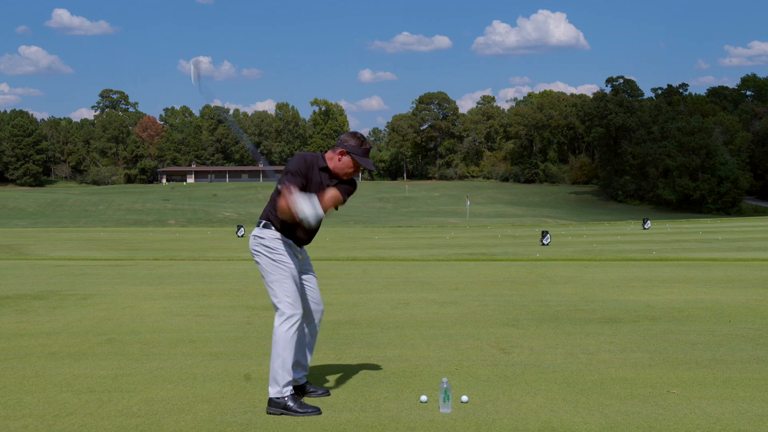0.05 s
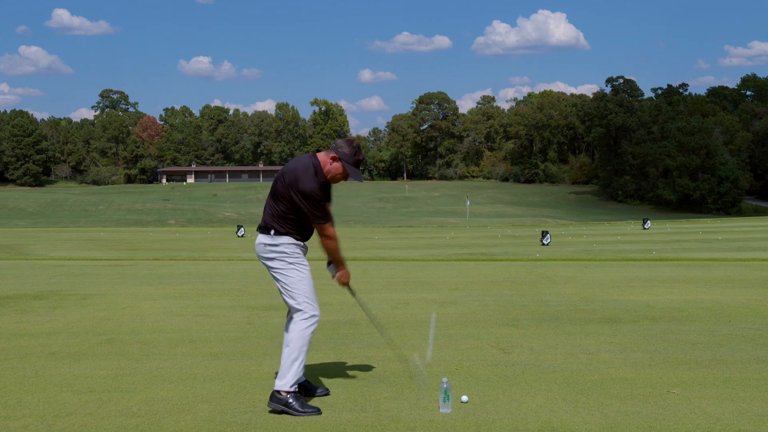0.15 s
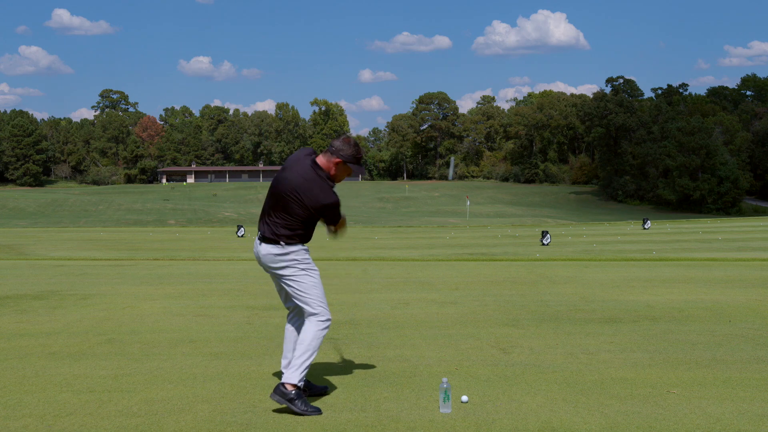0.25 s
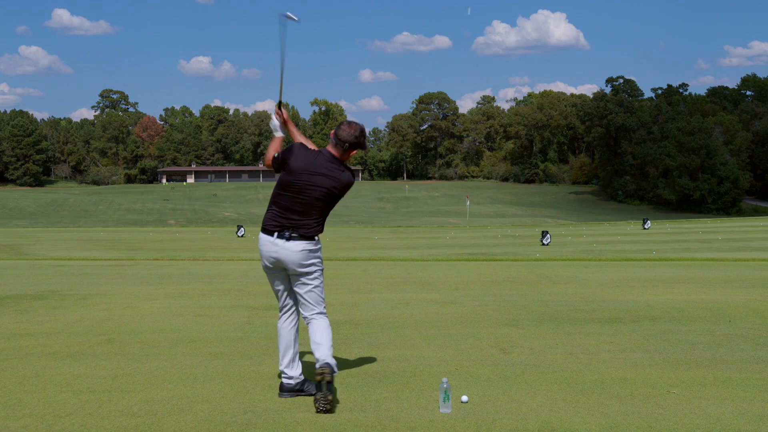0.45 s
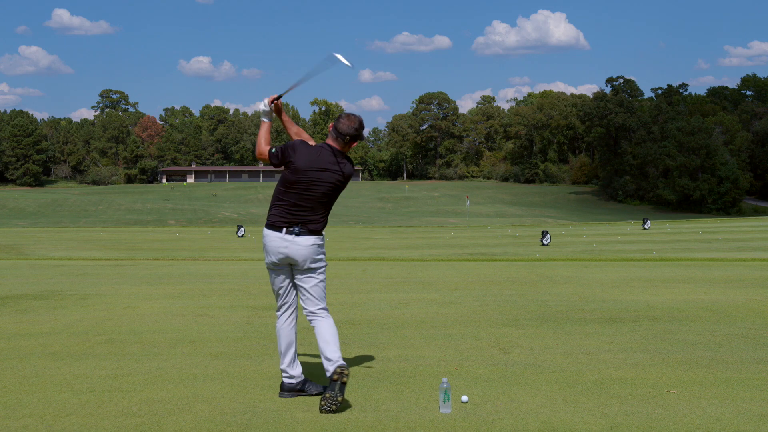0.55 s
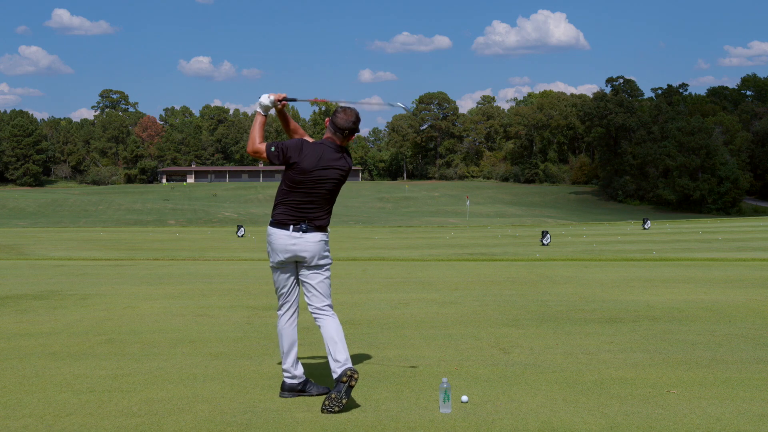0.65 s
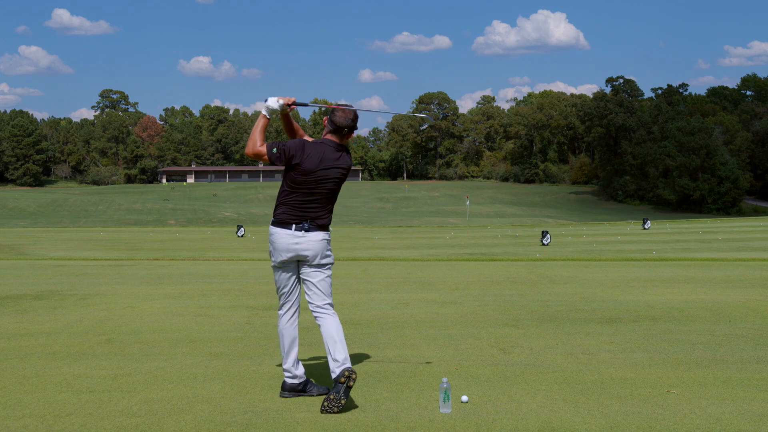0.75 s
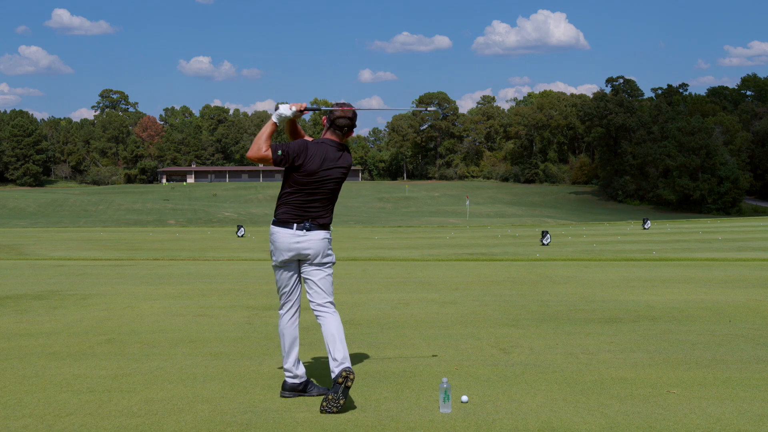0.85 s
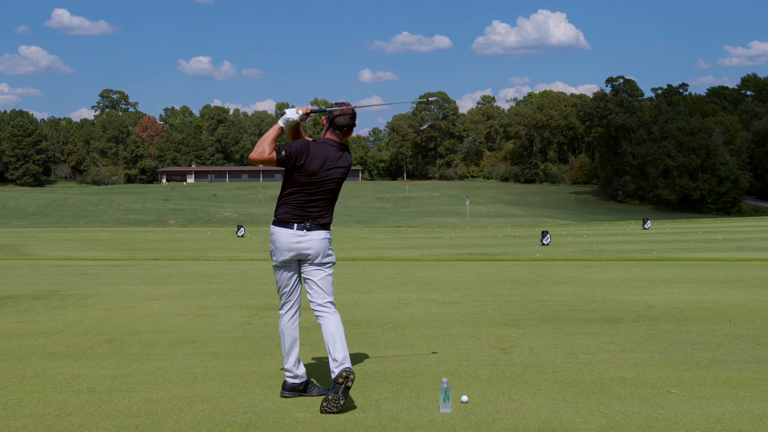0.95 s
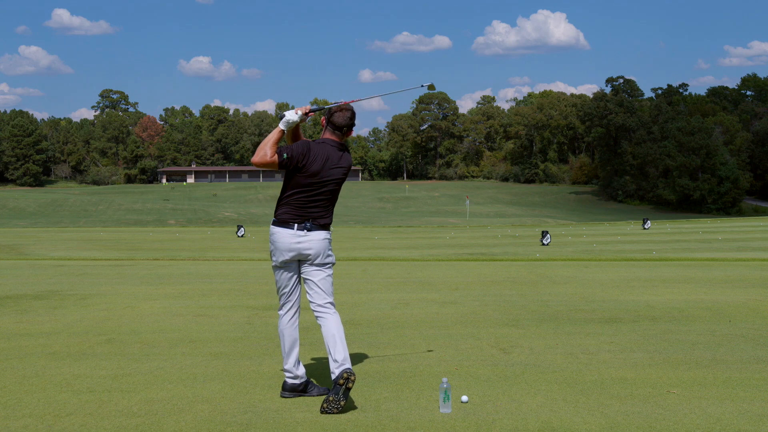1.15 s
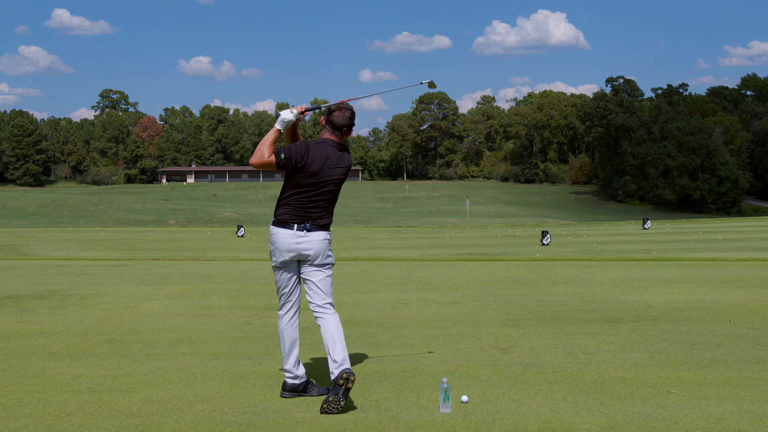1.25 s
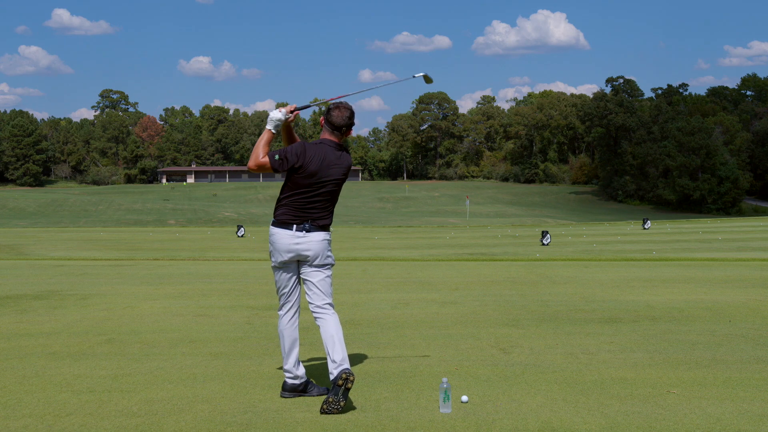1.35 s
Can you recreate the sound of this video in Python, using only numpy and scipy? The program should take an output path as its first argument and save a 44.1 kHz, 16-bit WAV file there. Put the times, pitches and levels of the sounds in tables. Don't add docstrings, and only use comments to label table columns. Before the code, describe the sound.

Close golf shot outdoors: cloth snaps and thumps on the body microphone, the club whooshes up in pitch, the ball is hit with a bright crack, rustling fades into faint air hush, and cloth rubs again at the end.

```python
import sys
import numpy as np
from scipy import signal
from scipy.fft import rfft, irfft
from scipy.io import wavfile
from scipy.ndimage import uniform_filter1d

SR = 44100
rng = np.random.default_rng(int(sys.argv[2]) if len(sys.argv) > 2 else 0)


def voltage_ratio(level):
    return 10 ** (np.asarray(level, float) / 20)


def log_audio(samples):
    frames = np.atleast_2d(samples).T
    limited = np.clip(frames, -1, 1)
    pcm = np.round(limited * 32767).astype(np.int16)
    wavfile.write(sys.argv[1], SR, pcm)


N = 61739
T = np.arange(N) / SR


def noise():
    return rng.standard_normal(N)


def colour(x, points):
    hz, db = np.array(points, float).T
    f = np.maximum(np.arange(N // 2 + 1) * SR / N, 1)
    gain = voltage_ratio(np.interp(np.log(f), np.log(hz), db))
    y = irfft(rfft(x) * gain, N)
    return y / np.std(y)


def band(x, hz, width):
    edges = [hz / (1 + width), min(hz * (1 + width), SR * 0.45)]
    y = signal.sosfilt(signal.butter(1, edges, "band", fs=SR, output="sos"), x)
    return y / np.std(y)


def high_pass(x, order, hz):
    return signal.lfilter(*signal.butter(order, hz, "high", fs=SR), x)


def walk(rate):
    k = int(SR / rate)
    steps = np.repeat(rng.standard_normal(N // k + 1), k)
    w = uniform_filter1d(uniform_filter1d(steps, k), k)[:N]
    return w / np.std(w)


def push(s, ms):
    u = (T - s) / (ms / 1000)
    return np.where((u > 0) & (u < 1), np.sin(np.pi * u) ** 2, 0)


def fade(s, t60):
    return (T > s) * voltage_ratio(-60 * np.clip(T - s, 0, 1) / t60)


def ring(x, modes):
    out = 0
    for hz, db, t60 in modes:
        pole = np.exp(2j * np.pi * hz / SR - np.log(1000) / (t60 * SR))
        out = out + voltage_ratio(db) * signal.lfilter([1], [1, -pole], x).imag
    return out


def course():
    # frequency in Hz, level in dB per Hz
    air = [(15, -31.5), (25, -5), (130, -3), (223, -12), (560, -15), (775, -8), (840, -12.5),
           (14400, -30.5), (16000, -38)]
    # multiple of the base pitch, level in dB
    orders = [(1, -78), (2, -84), (4, -85), (5, -78), (6, -80), (7, -83), (8, -86), (9, -89), (10, -89),
              (12, -87)]
    mower_hz, mower_db, air_db = 129.2, 5, -71
    phase = 2 * np.pi * np.cumsum(mower_hz * (1 + 0.002 * walk(2.5))) / SR
    mower = 0
    for k, db in orders:
        level = voltage_ratio(db + mower_db + 0.92 * walk(9.4))
        mower = mower + level * np.sin(k * phase + 6 * rng.random())
    hush = voltage_ratio(air_db + 0.8 * walk(4)) * colour(noise(), air)
    return hush + mower


def fibres():
    fibres_per_s, scatter_db, click_db = 900, 2.2, -4
    out = 0
    for hz in 125 * 2.0 ** np.arange(7):
        size = voltage_ratio(scatter_db * rng.exponential(1, N)) * noise()
        clicks = size * (rng.random(N) < fibres_per_s / SR)
        grain = voltage_ratio(click_db) * clicks / np.std(clicks) + noise()
        out = out + np.sqrt(hz) * band(grain, 1.4 * hz, 0.45)
    return out


def shirt():
    # peak time in seconds, peak dB, width in ms, crackle dB, crackle t60 in seconds
    snaps = [(0.0670, -29, 0.51, -36, 0.011), (0.0694, -37, 0.46, -42, 0.013),
             (0.091, -33, 2.1, -59.5, .03), (0.0952, -50, 1.2, -46, 0.029),
             (.1003, -20, 0.32, -38.5, 0.027), (0.1052, -30.5, 0.76, -45, 0.013),
             (.111, -29.5, 0.4, -56, 0.02), (0.2513, -34, .8, -46, .03), (0.2746, -30, 0.45, -40, 0.032),
             (0.2856, -27.5, 0.71, -40, 0.023), (0.2948, -26, 0.34, -42, 0.021),
             (0.2987, -31, 0.44, -49, 0.019), (0.3251, -31, 0.83, -54.5, .04),
             (0.4359, -37.5, 1.96, -71, 0.019), (1.347, -48.5, 1.2, -64.5, 0.025)]
    slaps = [(.2471, -16.5, .5, -46.5, 0.021), (.417, -38.5, 0.18, -60, 0.02), (.4055, -41, 0.41, -71, .02),
             (.496, -44, 0.97, -62, .02), (.574, -46, 1.19, -65.5, 0.045), (.764, -53.5, 0.56, -66.5, .04),
             (.805, -55, .4, -63.5, .03), (1.138, -53, 0.31, -62.5, 0.017), (1.302, -50, 0.54, -74, .02),
             (1.3565, -33.5, 0.31, -58, 0.017), (1.3595, -44.5, 0.49, -65, 0.018),
             (1.3634, -48, 0.44, -73.5, 0.018), (1.3705, -50, .5, -69, .02)]
    # time in seconds, rub level in dB, rumble level in dB
    turn = [(0, -65.5, -65), (0.03, -52, -66.5), (.11, -55, -54), (0.14, -58.5, -44.5), (.18, -55, -56),
            (.25, -47.5, -41), (0.301, -51, -52.5), (.34, -60, -57), (0.421, -63, -57), (.52, -65, -66.5),
            (.66, -71, -72.5), (.85, -76, -71.5), (1.22, -75.5, -70), (1.295, -64.5, -65),
            (1.342, -60.5, -56), (1.4, -62, -63.5)]
    # frequency in Hz, level in dB per Hz
    rub_colour = [(150, -3.5), (400, -0.5), (1000, -5), (2000, -11), (3500, -18), (6000, -20),
                  (11000, -27.5), (16000, -34)]
    rumble_colour = [(20, -11), (45, 0), (120, -8), (250, -12.5), (600, -32), (2000, -69)]
    crackle_colour = [(300, -9.5), (1000, 2.5), (2500, 2), (5000, -6.5), (8000, -6.5), (12000, -9),
                      (16000, -10)]
    tick_s = [.0688, .658, .0945]
    # frequency in Hz, level in dB, t60 in seconds
    ticks = [
        (4156, -38, 0.031),
        (1790, -56, 0.034),
        (5500, -42, 0.016),
    ]

    pulses, tails = 0, 0
    for sign, rows in ((0.98, snaps), (-0.86, slaps)):
        for s, db, ms, crackle_db, t60 in rows:
            pulses = pulses + sign * voltage_ratio(db) * push(s - ms / 1000, 2 * ms)
            tails = tails + voltage_ratio(crackle_db) * fade(s - 0.0003, t60)
    pulses = high_pass(pulses, 1, 110)
    crackle = tails * colour(fibres(), crackle_colour)

    s, rub_db, rumble_db = np.array(turn).T
    rub = voltage_ratio(np.interp(T, s, rub_db) + 2.5 * walk(60)) * colour(fibres(), rub_colour)
    rumble = voltage_ratio(np.interp(T, s, rumble_db) + 2.0 * walk(25)) * colour(noise(), rumble_colour)
    knocks = sum(ring(push(s, 0.068) / 2, [mode]) for s, mode in zip(tick_s, ticks))
    return pulses + crackle + rub + rumble + knocks


def creases():
    # centre time in seconds, centre Hz, level in dB, length in ms
    folds = [(.0745, 9000, -57, 4), (.085, 5000, -56.5, 3), (.103, 12400, -44, 4), (.1072, 11500, -46, 4),
             (.2355, 9000, -56, 5), (0.2428, 10500, -48.5, 7), (.249, 8498, -44, 3), (.269, 3460, -52.5, 6),
             (.379, 2910, -63.5, 16), (.406, 3000, -58.5, 9.5), (.432, 5015, -67, 27), (.49, 3000, -63, 15),
             (.53, 5000, -66, 4), (.575, 5000, -74, 40), (.60, 3995, -68, 13.8), (.627, 8000, -62.5, 4),
             (.661, 9500, -64.5, 4.4), (.672, 6000, -72, 19.9), (.729, 8500, -64, 2.9),
             (.75, 5000, -70, 10), (.97, 5000, -71, 9.2), (1.038, 5500, -72, 4), (1.065, 4500, -70, 4),
             (1.138, 3500, -64, 3), (1.16, 4005, -70, 3), (1.187, 4000, -67, 3), (1.2394, 3000, -64, 2.6),
             (1.2526, 3500, -62, 2.94), (1.27, 4500, -60, 3.06), (1.2917, 5500, -59, 2.9),
             (1.307, 3490, -55, 4), (1.351, 6340, -59.5, 4.5)]
    # time in seconds, level in dB
    sleeve = [
        (1.219, -97),
        (1.298, -75.5),
        (1.305, -62),
        (1.35, -58),
        (1.365, -65),
        (1.4, -71.5),
    ]
    # frequency in Hz, level in dB per Hz
    sleeve_colour = [(800, -30), (2000, -7), (3000, 3.5), (4500, -3.5), (6000, -14.5), (12000, -24)]
    s, db = np.array(sleeve).T
    drag = voltage_ratio(np.interp(T, s, db, -120) + 2.24 * walk(150)) * colour(fibres(), sleeve_colour)
    hiss = noise()
    rustles = 0
    for s, hz, db, ms in folds:
        rustle = band(band(hiss, hz, 0.59), hz, 0.59)
        rustles = rustles + voltage_ratio(db) * push(s - ms / 2000, ms) * rustle
    return drag + rustles


def swish():
    # time in seconds, shedding pitch in Hz, level in dB
    sweep = [
        (.12, 119.9, -61),
        (.15, 210, -55),
        (.168, 400, -53),
        (.177, 426, -41),
        (.187, 518, -55),
        (.196, 631, -35.5),
        (.209, 579, -32),
        (.219, 594, -37),
        (.232, 563, -60.5),
    ]
    # (Hz, dB)
    air_colour = [(300, -6.5), (1100, 2), (2500, -9), (6000, -15), (16000, -28)]
    half_db, rough_db, air_db = -9, -5, -12.5
    s, hz, db = np.array(sweep).T
    pitch = np.interp(T, s, hz) * (1 + 0.022 * walk(150))
    phase = 2 * np.pi * np.cumsum(pitch) / SR
    tone = np.sin(phase) * (1.4 + voltage_ratio(rough_db) * walk(500))
    half = voltage_ratio(half_db) * np.sin(phase / 2) * walk(200)
    air = voltage_ratio(air_db) * colour(noise(), air_colour)
    return voltage_ratio(np.interp(T, s, db, -120, -120)) * (tone + half + air)


def blows(hits):
    return sum(voltage_ratio(db) * 2 * push(s, ms) / (ms / 1000 * SR) for s, db, ms in hits)


def strike():
    # frequency in Hz, level in dB, t60 in seconds
    ball = [(450, -24, 0.0054), (1099, -7, 0.017), (1240, -8.5, 0.019), (1423, -0.5, 0.0084),
            (2050, -15, .008), (2590, -18, .008)]
    head = [(2070, -1, 0.0091), (2700, -6, .008), (4320, -4, 0.0076), (4760, -5, .009), (5500, -14, .005),
            (6200, -12, 0.013), (6590, -20, 0.015), (7600, -4, 0.0057), (8760, -12, .004),
            (9880, -5, 0.004), (11500, -20, .005), (13450, -16, 0.005)]
    # start in seconds, level in dB, contact in ms
    ball_hits = [
        (.2209, -5, 0.52),
        (.22195, 0.5, 0.24),
        (.2235, -11, 0.27),
        (.2253, -14.5, 0.52),
        (.2277, -15, 0.59),
    ]
    head_hits = [
        (.2213, -17, 0.052),
        (.2231, -2.5, 0.091),
        (.2237, -7.5, .08),
        (.2254, -16, 0.14),
    ]
    click = ring(blows(head_hits), head) - ring(blows(ball_hits), ball)
    click = high_pass(click, 2, 267)
    spray = voltage_ratio(-24.5) * fade(0.2231, 0.017) * band(noise(), 3000, 0.63)
    thud = band(band(noise(), 271, 1.3), 271, 1.7)
    turf = voltage_ratio(-34) * fade(0.222, 0.12) * thud
    return click + spray + turf


def scene():
    return (course() + shirt() + creases() + swish() + strike())[None]


def band_limit(x):
    return signal.sosfilt(signal.butter(12, 16370, fs=SR, output="sos"), x)


def record(dry):
    ceiling = 1.02
    dry = signal.sosfilt(signal.ellip(6, 0.3, 45, 16200, fs=SR, output="sos"), dry)
    mix = dry / (1 + np.abs(dry / ceiling) ** 6) ** (1 / 6)
    return band_limit(mix)


dry = scene()
out = record(dry)
log_audio(out)
```